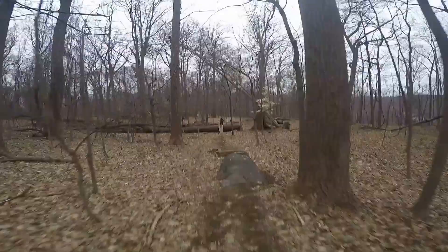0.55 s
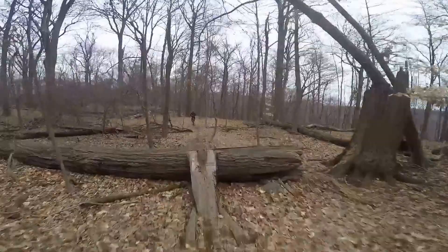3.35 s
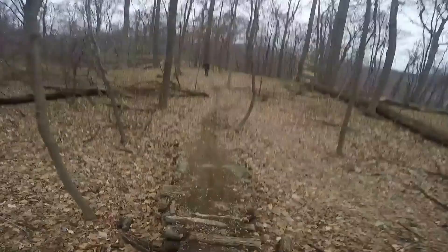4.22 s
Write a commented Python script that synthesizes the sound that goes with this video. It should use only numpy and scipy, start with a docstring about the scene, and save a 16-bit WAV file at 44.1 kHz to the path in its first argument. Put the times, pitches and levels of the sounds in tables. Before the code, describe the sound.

A mountain bike rolls fast through crunching dry leaves, then knocks and rattles over a log, with wind rumbling on the microphone.

```python
"""A mountain bike with a camera on it rolls fast through deep, dry leaves that snap under the tyres.
From about 3.7 s it crosses a log on a plank ramp: the rustle drops, the frame knocks, and hard jolts
shake the camera and make its mount scrape. The chain rattles, loudest just before 6 s. Then the bike
rolls on through thinner leaves. All along, wind and shaking rumble in the microphone, the camera case
colours the tyre noise, and the electronics whine faintly."""
import sys
import numpy as np
from scipy import signal
from scipy.fft import rfft, irfft, next_fast_len
from scipy.io import wavfile
from scipy.ndimage import uniform_filter1d

SR = 44100
rng = np.random.default_rng(int(sys.argv[2]) if len(sys.argv) > 2 else 0)


def wav_out(sig):
    """Save sig, one row per channel (or a flat mono array), as 16-bit PCM at SR to the path in sys.argv[1]."""
    wavfile.write(sys.argv[1], SR, np.round(np.clip(np.atleast_2d(sig).T, -1, 1) * 32767).astype(np.int16))


N = 355887
T = np.arange(N) / SR  # the time of every sample, in seconds

# tyres on deep leaves, bare wood, then thinner leaves: t/s, relative level/dB, crispness/dB
TYRE_NOISE = [(0.0, -43, 3.5), (0.15, -44.5, 0.5), (0.3, -42.5, 5.5), (0.9, -39.5, 7), (1.3, -41, 4),
              (1.55, -40.3, 7), (2.1, -41.5, 3.5), (3.57, -43.5, 2.5), (3.67, -48.5, -4.5),
              (4.5, -51, -7.5), (4.98, -49.5, -7), (5.25, -56, -9), (5.8, -51.5, -4.5), (6.17, -47, -1.5),
              (6.9, -46, -0.5), (7.12, -50.5, -4), (7.95, -52, -4), (8.07, -47.5, -0.5)]
# the tyres press down and the crunch swells: t/s, rise/dB, length/s
TYRE_PRESSES = [(3.994, 4.5, 0.023), (4.28, 5, 0.037), (5.916, 3.5, 0.025), (6.276, 1, 0.036),
                (6.737, 2, 0.031), (7.242, 4.5, 0.023), (7.676, 4, 0.048)]
# tone of crushed leaves: f/Hz, relative level/dB
LEAF_TONE = [(150, -12), (350, -17.5), (720, -11), (1000, -7.5), (1300, 0), (2100, 0), (2700, 3.5),
             (3800, -1.5), (4250, -7), (4700, -19), (6300, -27), (8000, -34), (10200, -35.5), (13500, -53)]
# pitches that the camera case boosts: f/Hz, width/Hz, boost/dB
CASE_BOOSTS = [(261, 65, 6.5), (440, 28, 8), (559, 80, 6), (885, 54, 4), (1069, 51, 4), (1344, 84, 5),
               (2640, 1030, 2), (3830, 193, 7), (5660, 210, 8)]
# a tyre ploughs through a heap of leaves: t/s, level/dB, length/s, brightness/(dB per octave)
LEAF_HEAPS = [(0.894, -28, 0.012, -6.5), (0.94, -29.5, 0.032, -7), (1.132, -35, .012, -2.5),
              (1.469, -36, 0.053, -7), (1.70, -39.5, .03, -7), (2.0, -39.5, 0.019, -2),
              (2.334, -38, 0.023, -5.5), (3.307, -44, .018, 2), (3.759, -43.5, 0.0069, -5)]
# tone of those heaps: f/Hz, relative level/dB
HEAP_TONE = [(600, -31), (2000, -13), (2700, 6), (3850, 3.5), (4600, -10), (6500, -21.5), (8000, -27.5),
             (10200, -23.5), (14000, -41)]
# tone of brittle leaves and twigs: f/Hz, relative level/dB
TWIG_TONE = [(500, -30), (2000, -6), (3900, -2), (5600, -3), (7500, -14), (10500, -12), (15000, -26)]

# the bike hits wood and roots: t/s, level/dB, clatter length/s, hardness/Hz,
# ring blend (0 brighter clack, 1 deeper clunk)
KNOCKS = [(3.781, -48, .008, 600, 0.38), (3.902, -38.5, 0.014, 1600, 0.78), (3.980, -31, 0.0044, 480, 0),
          (4.022, -39, 0.014, 1600, 0.018), (4.14, -52, 0.018, 600, 0.45),
          (4.304, -28.5, 0.0069, 3000, 0.93), (4.598, -38, .005, 450, 0.033),
          (4.659, -39.5, .006, 4000, 0.35), (4.697, -24.5, 0.004, 2920, 0.23),
          (5.012, -24.5, 0.0056, 3200, 0.089), (5.021, -27.5, 0.0038, 3050, 0.22),
          (5.540, -44.5, 0.012, 200, 0.91), (5.671, -37.5, .006, 1400, 0.97),
          (5.812, -41.5, 0.0083, 1000, 0.93), (5.927, -42, 0.006, 1200, 0.95),
          (7.335, -50.5, .01, 250, 0.93), (7.722, -26.5, 0.0036, 3220, 0.18),
          (7.785, -32, 0.0076, 2380, 0.98), (7.793, -40, .004, 1800, .9)]
# how the frame rings: f/Hz, width/Hz, level in the brighter clack/dB, level in the deeper clunk/dB
FRAME_RINGS = [(248, 87, -12.5, 3), (456, 38, -27, 2), (590, 34, -1.5, -11), (830, 170, 1, -24),
               (1117, 43, -8, 9), (1227, 93, 3.5, 0), (1650, 160, -12, 0), (1845, 160, -5, 2.5),
               (2285, 180, 5.5, -15), (2540, 100, -17, 0), (3400, 170, -15, -21), (4200, 380, -11, -29),
               (5200, 490, -20, -29)]
# the camera mount scrapes in its joint: t/s, level/dB, swell/s, fade/s, tightness (multiplies the pitch)
SCRAPES = [(4.480, -23.5, 0.0044, 0.0078, 1.086), (4.510, -34.5, 0.014, 0.011, 0.77),
           (4.533, -38, .007, 0.01, 1.035), (4.585, -21.5, 0.015, 0.0074, 1.0),
           (4.599, -12, 0.0093, 0.0043, 1.0)]
# tone of the rasping joint: f/Hz, relative level/dB
SCRAPE_TONE = [(300, -27.5), (850, -20), (1060, -8.5), (1700, -5.5), (3200, -5.5), (3700, -12.5),
               (5300, -16), (7000, -29), (9500, -40.5), (11500, -32), (15000, -51)]
# how the plastic mount rings: f/Hz, width/Hz, relative level/dB
MOUNT_RINGS = [(1067, 37, 3), (1703, 42, 2.5), (2020, 110, -3.5), (2324, 82, 0), (2650, 88, -12),
               (3170, 160, 4), (4600, 130, -4), (4970, 120, -7)]
# the chain slaps and jingles: t/s, level/dB, fade/s, brightness/(dB per octave)
CHAIN_RATTLES = [(3.871, -51, .003, 7), (3.995, -52, .008, 4), (4.012, -51, 0.014, 2),
                 (4.303, -54, .003, 2), (4.556, -46, 0.0024, 2), (4.796, -44, 0.027, 0.5),
                 (4.830, -38.5, 0.01, -4.5), (4.886, -36.5, 0.022, -2), (5.604, -59, .006, 6),
                 (5.615, -48, 0.016, 0), (5.680, -39, 0.0098, -3.5), (5.695, -38.5, 0.018, -1.5),
                 (5.734, -30.5, .008, 1), (5.749, -40, 0.013, -1), (5.930, -56, .005, 7)]
# tone of the chain: f/Hz, relative level/dB
CHAIN_TONE = [(880, -52), (1500, -24), (1900, 0), (2920, -8.5), (3760, -9.5), (4480, -10.5), (6820, -15),
              (8370, -21), (10700, -15.5), (11900, -27), (15500, -33)]
# pitches that the chain links boost: f/Hz, width/Hz, boost/dB
LINK_BOOSTS = [(1950, 120, -2.5), (3400, 79, -3), (3750, 320, 12.5), (5370, 250, 4.5), (6900, 300, 6),
               (10300, 400, -1)]
# thin squeaks from the bike: t/s, level/dB, length/s, f/Hz
SQUEAKS = [(1.533, -47, .012, 4850), (1.83, -49, .007, 4900)]

# bumps shove the camera: t/s, relative level/dB, length/s, level of the shaking/dB
JOLTS = [(1.056, -14.5, 0.0087, -28), (1.771, -14.5, .012, -42), (1.958, -15, 0.016, -39),
         (2.192, -27, .008, -33), (2.784, -15, 0.018, -39), (3.951, -9.5, 0.0093, -34),
         (3.998, -1.5, 0.0074, -26.5), (4.344, -15, 0.021, -38), (4.515, -8.5, 0.0235, -30),
         (4.621, -13, 0.0085, -26), (4.637, -13, 0.014, -32), (4.725, -9.5, 0.015, -23),
         (4.866, -13.5, 0.015, -45), (5.039, -8, 0.0096, -39), (6.881, -19, 0.022, -43)]
# tone of the camera shaking on its mount: f/Hz, relative level/dB
SHAKE_TONE = [(30, 3.5), (65, -3.5), (85, -4), (108, 3.5), (135, -8.5), (165, -20), (220, -32), (400, -46),
              (900, -90)]
# steady air flowing over the microphone: t/s, relative level/dB
AIRFLOW = [(0.0, -31), (3.7, -31), (4.2, -33), (4.6, -24), (5.3, -27), (6.0, -37), (8.07, -34)]
# gusts of wind: t/s, relative level/dB, length/s
GUSTS = [(0.05, -23, .04), (0.21, -24, .05), (0.63, -24, .045), (0.9, -24, .04), (1.66, -23, .06),
         (3.2, -24, .06), (3.55, -26, .04), (3.81, -22, .035), (4.39, -14, .035), (4.57, -15, .04),
         (5.31, -20, .045), (7.33, -33, .03)]
# tone of the wind rumble: f/Hz, relative level/dB
WIND_TONE = [(6, -23.5), (11, -1.5), (16, 4), (24, -1), (35, -6), (55, -19.5), (80, -23.5), (150, -43),
             (300, -64.5), (700, -100)]
# tone of the hiss from the electronics: f/Hz, relative level/dB
HISS_TONE = [(200, 3), (1000, -13), (4000, 11.5), (7000, 8.5), (10000, 3), (14000, 1), (15200, -12)]


def leaves(clump_db=1.0, patch_db=0.61, treble_from_hz=2250):
    """Thousands of leaves snap each second, in clumps and patches; deep dry leaves add treble."""
    level_db, crisp_db = rolling()
    snaps = clicks(N, per_s=8000, spread_db=2.5)
    snaps *= gain_of(clump_db * wander(35) + patch_db * wander(6.7))
    crunch = colour(snaps, lambda hz: tone_at(LEAF_TONE, hz) + boost_at(CASE_BOOSTS, hz))
    body = signal.sosfiltfilt(signal.butter(3, treble_from_hz, fs=SR, output="sos"), crunch)
    treble = (crunch - body) * gain_of(crisp_db - 4)
    return gain_of(level_db + 5.5) * (body + treble)


def rolling(lift_at_s=4.125, lift_length_s=0.054, lift_db=-10):
    """The ground sets the tyres' level and crispness; the weight on the wheels moves the level."""
    level_db, crisp_db = follow(TYRE_NOISE)
    dip_db = lift_db * bump(lift_at_s, lift_length_s)  # the front wheel lifts for a moment
    press_db = sum(db * bump(s, length) for s, db, length in TYRE_PRESSES)
    return level_db + dip_db + press_db, crisp_db


def leaf_heaps():
    """Short swishes of many snaps as the tyre meets deeper leaves."""
    out, t = np.zeros(N), np.arange(-SR // 8, SR // 8) / SR
    for s, db, length, bright_db in LEAF_HEAPS:
        tone = lambda hz: tone_at(HEAP_TONE, hz) + bright_db * np.log2(hz / 4000 + 0.0051)
        snaps = colour(clicks(len(t), per_s=6000, spread_db=2), tone)
        add(out, s + t[0], gain_of(db) * snaps * bump(0, length, t))
    return out


def twigs(trim_db=-21, clump_db=3):
    """Single brittle leaves and twigs snap close by, brighter than the rest."""
    tyres_db, _ = rolling()
    snaps = clicks(N, per_s=440, spread_db=2.5) * gain_of(clump_db * wander(25))
    level_db = np.minimum(tyres_db, -48) + trim_db
    return gain_of(level_db) * colour(snaps, lambda hz: tone_at(TWIG_TONE, hz))


def tyre_knobs(level_db=-61, top_hz=650):
    """The knobs of the tyres drum on the ground, harder where the leaves are loud; the case hums along."""
    tyres_db, _ = rolling()
    tone = lambda hz: 1.5 * boost_at(CASE_BOOSTS, hz) - 20 * np.log10(1 + (hz / top_hz) ** 3)
    drumming = colour(clicks(N, per_s=900, spread_db=2.5), tone)
    swell_db = 0.2 * (tyres_db - tyres_db.mean()) + 1.7 * wander(15)
    return gain_of(level_db + swell_db) * drumming


def frame_knocks(clatter=0.14, band_hz=(230, 6500)):
    """A blow and a short clatter of loose parts make the frame ring; soft blows are duller."""
    out, t = np.zeros(N), np.arange(SR // 8) / SR
    for s, db, length, hard_hz, blend in KNOCKS:
        blow = clatter * clicks(len(t), per_s=6400, spread_db=-2) * np.exp(-t / length)
        blow[0] += 1  # the hit itself
        blow = signal.sosfilt(signal.butter(2, hard_hz, fs=SR, output="sos"), blow)
        blow = signal.sosfilt(signal.butter(3, band_hz, "band", fs=SR, output="sos"), blow)
        rings = [(f, width, clack_db + blend * (clunk_db - clack_db))
                 for f, width, clack_db, clunk_db in FRAME_RINGS]
        add(out, s, set_loudest(ring(blow, rings), db))
    return out


def mount_scrapes(ring_db=3):
    """Many tiny slips in the joint swell and die away, making the plastic mount ring."""
    out, t = np.zeros(N), np.arange(-SR // 12, SR // 12) / SR
    for s, db, swell, fade, tight in SCRAPES:
        slips = clicks(len(t), per_s=18000, spread_db=2)
        rasp = colour(slips, lambda hz: tone_at(SCRAPE_TONE, hz / tight))
        rasp *= np.exp(-np.where(t < 0, (t / swell) ** 2, t / fade))
        rings = [(f * tight, width, level + ring_db) for f, width, level in MOUNT_RINGS]
        add(out, s + t[0], set_loudest(rasp + ring(rasp, rings), db))
    return out


def chain():
    """Links click against each other in showers that die away quickly."""
    out, t = np.zeros(N), np.arange(SR // 8) / SR
    metal = lambda hz: tone_at(CHAIN_TONE, hz) + boost_at(LINK_BOOSTS, hz)
    for s, db, fade, bright_db in CHAIN_RATTLES:
        tone = lambda hz: metal(hz) + bright_db * np.log2(hz / 4000 + 0.01)
        jingle = colour(clicks(len(t), per_s=3300, spread_db=0), tone)
        add(out, s, set_loudest(jingle * np.exp(-t / fade), db))
    return out


def squeaks(width_hz=450):
    """Short, rough whistles: noise gathered around one pitch."""
    out, t = np.zeros(N), np.arange(-SR // 20, SR // 20) / SR
    for s, db, length, pitch_hz in SQUEAKS:
        whistle = colour(rng.standard_normal(len(t)), lambda hz: -10 * ((hz - pitch_hz) / width_hz) ** 2)
        add(out, s + t[0], set_loudest(whistle * bump(0, length, t), db))
    return out


def jolts(turn_s=0.0031):
    """Each jolt shoves the camera one way and then sharply back, making a thump."""
    out, t = np.zeros(N), np.arange(-SR // 10, SR // 10) / SR
    for s, db, length, _ in JOLTS:
        add(out, s + t[0], gain_of(db) * np.tanh(t / turn_s) * bump(0, length, t))
    return out


def camera_shake(base_db=-40.5, rise_s=0.02, fade_s=0.044):
    """The camera shakes with a low rumble: on small bumps, most in deep leaves, and hard at each jolt."""
    _, crisp_db = rolling()
    power = gain_of(base_db + 0.62 * crisp_db + 2.5 * wander(9.3)) ** 2
    for s, _, _, shake_db in JOLTS:
        kick = np.exp(-np.maximum((s - T) / rise_s, (T - s) / fade_s))
        power += (gain_of(shake_db) * kick) ** 2
    rumble = colour(clicks(N, per_s=150, spread_db=3.5), lambda hz: tone_at(SHAKE_TONE, hz))
    return steady(rumble) * np.sqrt(power)


def wind(trim_db=3, limit_db=-16, puff_delay_s=0.01, puff_length_s=0.035):
    """Air pushes on the microphone: a steady flow, gusts, and a puff as each jolt swings the camera."""
    flow_db, = follow(AIRFLOW)
    puffs = [(s + puff_delay_s, db - 7, puff_length_s) for s, db, _, _ in JOLTS]
    gust_power = sum((gain_of(db) * bump(s, length)) ** 2 for s, db, length in GUSTS + puffs)
    strength = gain_of(trim_db) * np.sqrt(gain_of(flow_db) ** 2 + gust_power)
    air = steady(colour(rng.standard_normal(N), lambda hz: tone_at(WIND_TONE, hz)))
    return air * np.minimum(strength, gain_of(limit_db))


def electronics(whine_hz=6308.7, whine_db=-71, octave_db=-74, pictures_per_s=30, hiss_db=-70):
    """Faint hiss and a thin whine whose wave flips over with each picture the camera takes."""
    flips = (-1.0) ** np.floor(T * pictures_per_s + rng.random())
    flips = uniform_filter1d(flips, size=160)  # softened so that they do not click
    phase = 2 * np.pi * whine_hz * T
    whine = gain_of(whine_db) * flips * np.sin(phase)
    octave = gain_of(octave_db) * np.sin(2 * phase)
    hiss = gain_of(hiss_db) * colour(rng.standard_normal(N), lambda hz: tone_at(HISS_TONE, hz))
    return np.sqrt(2) * (whine + octave) + hiss


def gain_of(db):
    """Turns decibels into a number to multiply by."""
    return 10 ** (np.asarray(db) / 20)


def unit_level(x):
    """Scales a sound to an average strength (rms) of 1."""
    return x / np.sqrt(np.mean(x ** 2) + 1e-20)


def set_loudest(sound, db):
    """Sets the loudest few milliseconds of a sound to a level."""
    return gain_of(db) * sound / np.sqrt(uniform_filter1d(sound ** 2, size=130).max())


def steady(rumble):
    """Gives every stretch of a rumble the same strength."""
    power = abs(signal.hilbert(rumble)) ** 2 / 2
    return rumble / np.sqrt(uniform_filter1d(power, size=4000))


def tone_at(table, hz):
    """Looks up the dB of a tone table at any frequency."""
    f, db = np.transpose(table)
    return np.interp(np.log(hz + 1), np.log(f + 1), db)


def boost_at(boosts, hz):
    """The dB that a set of boosted pitches adds at any frequency."""
    return sum(db / (1 + (2 * (hz - f) / width) ** 2) for f, width, db in boosts)


def follow(table):
    """Joins the rows of a time table with straight lines, one curve for each value column."""
    s, *columns = np.transpose(table)
    return [np.interp(T, s, column) for column in columns]


def colour(x, tone):
    """Turns each frequency of x up or down by tone(hz) dB; the result has strength 1."""
    size = next_fast_len(len(x))
    gains = gain_of(tone(np.fft.rfftfreq(size, 1 / SR)))
    return unit_level(irfft(rfft(x, size) * gains, size)[:len(x)])


def ring(x, rings):
    """Lets x set a few pitches ringing; the wider ones die away sooner."""
    out = 0
    for f, width, db in rings:
        decay = np.exp(-np.pi * width / SR)
        feedback = [1, -2 * decay * np.cos(2 * np.pi * f / SR), decay ** 2]
        out = out + gain_of(db) * signal.lfilter([1 - decay, 0, decay - 1], feedback, x)
    return out


def wander(rate_hz):
    """A random curve of strength 1 that wobbles up to about the given rate."""
    return colour(rng.standard_normal(N), lambda hz: -20 * np.log10(1 + (hz / rate_hz) ** 4))


def clicks(size, per_s, spread_db):
    """Tiny clicks at random times; a spread above 0 makes a few louder, below 0 a few softer."""
    heights = gain_of(spread_db * np.minimum(rng.exponential(1, size), 5))
    signs = rng.choice([-1, 1], size)
    happens = rng.random(size) < per_s / SR
    return unit_level(heights * signs * happens)


def bump(s, length, t=T):
    """A smooth swell of height 1 around time s."""
    return np.exp(-((t - s) / length) ** 2 / 2)


def add(mix, s, sound):
    """Lays a sound into the mix at time s."""
    part = mix[round(s * SR):][:len(sound)]
    part += sound[:len(part)]


def scene():
    """Everything that reaches the one microphone."""
    ground = leaves() + leaf_heaps() + twigs() + tyre_knobs()
    bike = frame_knocks() + mount_scrapes() + chain() + squeaks()
    return (ground + bike + wind() + camera_shake() + jolts())[None]


def record(dry, top_hz=15400):
    """The camera adds its own whine and hiss, then cuts off the highest treble."""
    treble_cut = signal.firwin(511, top_hz, window=("kaiser", 9), fs=SR)
    return signal.oaconvolve(dry + electronics(), treble_cut[None], "same")


dry = scene()
out = record(dry)
wav_out(out)
```